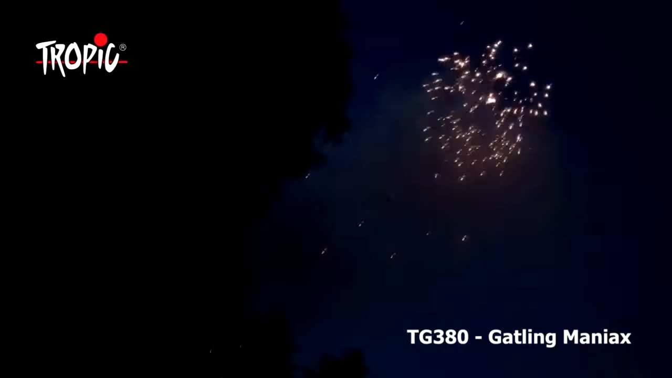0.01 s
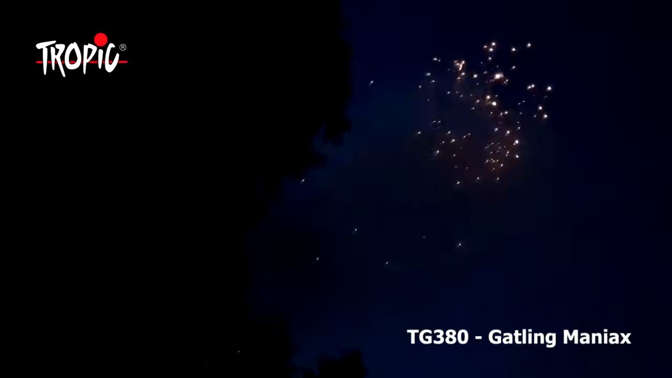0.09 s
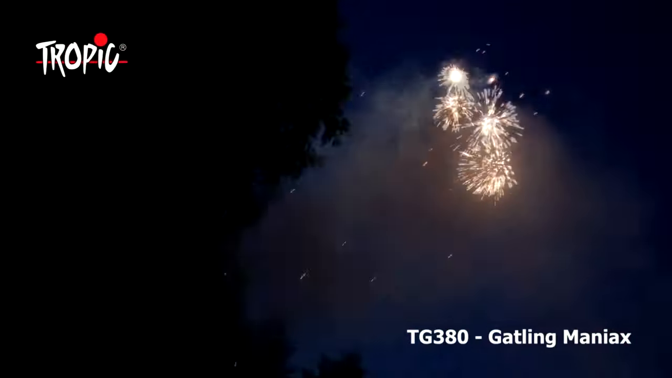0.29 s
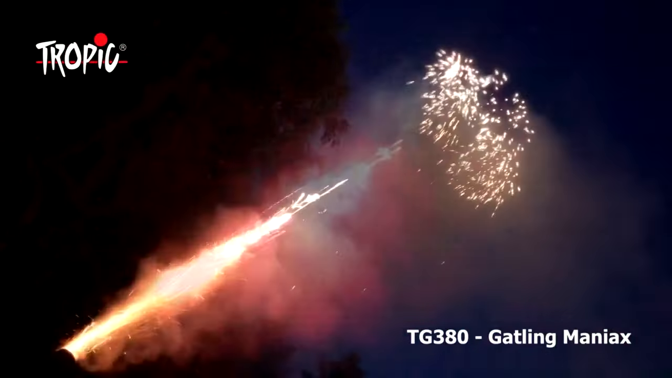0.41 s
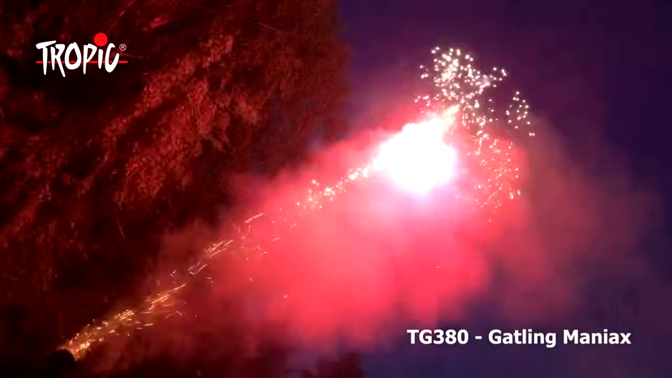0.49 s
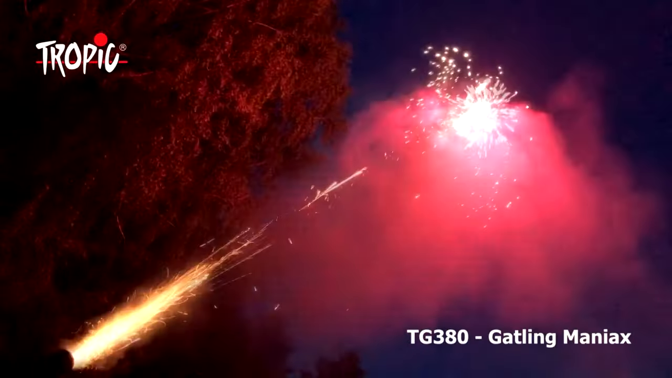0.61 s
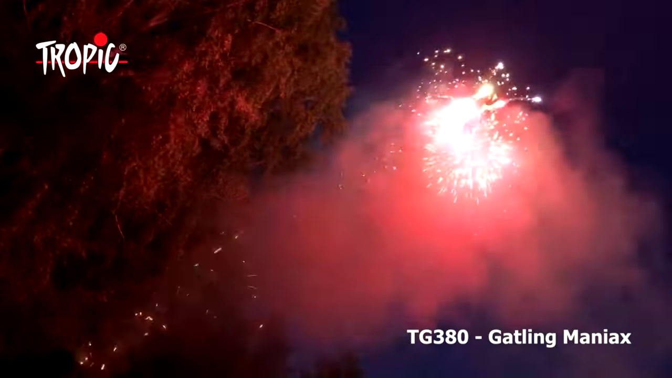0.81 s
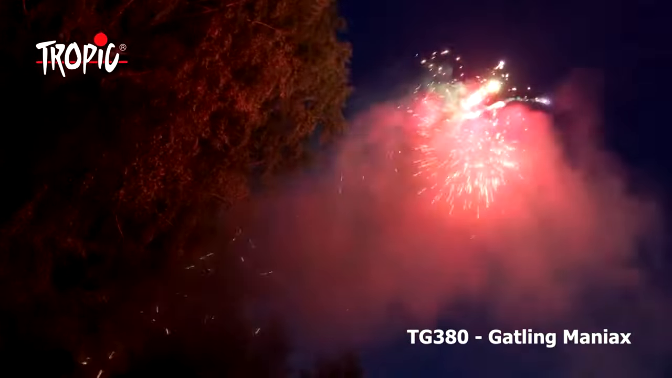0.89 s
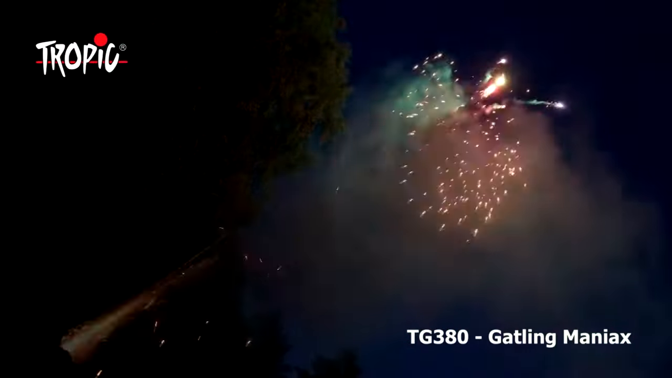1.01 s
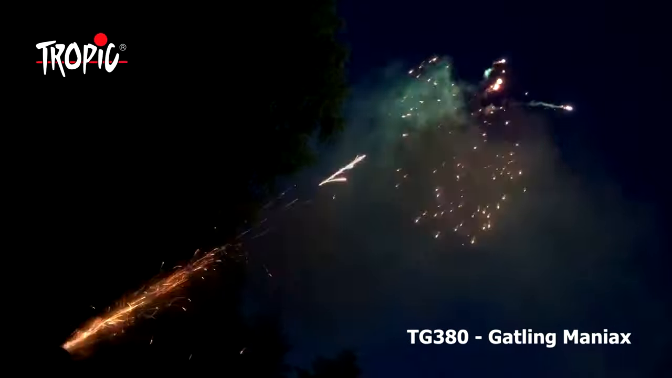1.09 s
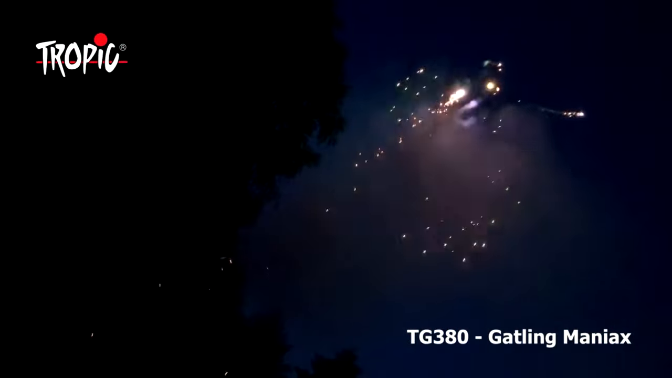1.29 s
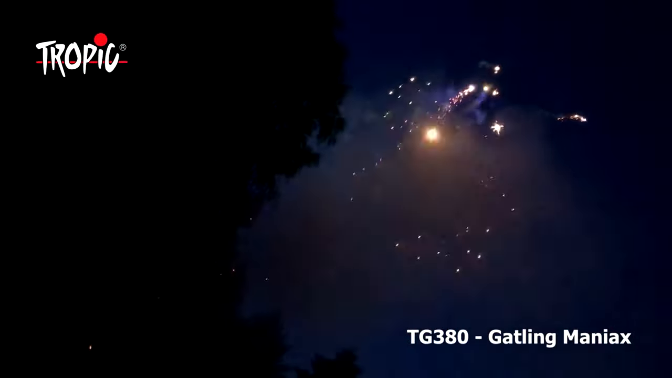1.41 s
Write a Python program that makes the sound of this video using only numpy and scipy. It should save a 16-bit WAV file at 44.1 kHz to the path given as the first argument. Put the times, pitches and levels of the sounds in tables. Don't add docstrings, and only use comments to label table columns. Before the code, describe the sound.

Multi-shot firework: sharp cracks and hissing thumps in quick clusters, with echoes fading between them

```python
import sys
import numpy as np
from scipy import signal
from scipy.fft import rfft, irfft, next_fast_len
from scipy.io import wavfile
from scipy.ndimage import uniform_filter1d

SR = 44100
rng = np.random.default_rng(int(sys.argv[2]) if len(sys.argv) > 2 else 0)


def wrap_up_sound(samples):
    columns = np.atleast_2d(samples).T
    tamed = np.clip(columns, -1, 1)
    steps = np.round(tamed * 32767).astype(np.int16)
    wavfile.write(sys.argv[1], SR, steps)


def volts(x):
    e = np.asarray(x, float) / 20
    return 10 ** e


N = 63945

# t/s, peak/dB, push length/ms, scattered echo/dB, limiter dip/dB
BANGS = [(0.2074, 8.5, 0.056, -27, -6.5), (0.2154, 4, 0.17, -36, -4), (.2372, 8.5, .07, -33, -8.5),
         (0.2562, -6.5, 0.6, -45, 0), (.2624, -5, 0.86, -18.5, -6.5), (.2855, -4, 0.31, -22.5, -21.5),
         (0.499, -1.5, 0.47, -23, -15), (0.5374, -3.5, 0.68, -28.5, -3), (0.5918, 7, 0.086, -22, -14),
         (0.7064, -7, .1, -38, 0), (.72115, 7, 0.1, -21.5, -15), (.9460, -2.5, 0.67, -29.5, 4),
         (1.3874, -11.5, 0.18, -43, -13), (1.4279, 5.5, 0.067, -40.5, 2)]


def read(table, f_hz, column=1):
    rows = np.array(table, float)
    return np.interp(np.log(np.maximum(f_hz, 1)), np.log(rows[:, 0]), rows[:, column])


def shape(x, response):
    size = next_fast_len(2 * N)
    f_hz = np.arange(size // 2 + 1) * SR / size
    return irfft(rfft(x, size) * response(f_hz), size)[..., :N]


def band(x, centre_hz, width_hz):
    def resonance(f):
        damping = 1j * f * width_hz
        return damping / (centre_hz ** 2 - f ** 2 + damping)
    return shape(x, resonance)


def unit(x):
    return x / np.sqrt(np.mean(x ** 2))


def blasts():
    # t/s, peak/dB
    crackles = [(.0685, -37), (.0750, -24), (.1160, -40), (.1277, -45), (.1420, -21), (.1925, -46),
                (0.254, 4), (0.2626, 1), (.2801, -24), (0.2835, -22), (0.4963, -19), (0.5293, 8),
                (0.5387, 7), (.9462, -4), (.7373, -22), (1.1100, -25), (1.1315, -22), (1.1733, -15.5),
                (1.392, -21), (1.3921, -21), (1.3944, -8), (1.398, -4.5), (1.4005, -21)]
    crackle_push_ms = 0.05
    rows = [b[:3] for b in BANGS] + [(s, db, crackle_push_ms) for s, db in crackles]

    def spectrum(f):
        total = 0
        for start_s, peak_db, push_ms in rows:
            push_s = push_ms / 1000
            jw = 2j * np.pi * f * push_s
            wave = SR * push_s * jw / (1 + jw) ** 2
            total = total + volts(peak_db) * wave * np.exp(-2j * np.pi * f * start_s)
        return total

    return shape(np.eye(1, N)[0], spectrum)


def through_air(x, t):
    last_stars_s, close_hz, far_hz = 1.3, 13500, 9400
    close = shape(x, lambda f: 1 / (1 + (f / close_hz) ** 4))
    far = shape(x, lambda f: 1 / (1 + (f / far_hz) ** 4))
    return np.where(t < last_stars_s, close, far)


def near_echoes(x):
    # delay/ms, level/dB, low-pass f/Hz
    reflections = [(.27, -8, 5000), (1.22, -6, 1400)]

    def paths(f):
        total = 1
        for delay_ms, db, dull_hz in reflections:
            total = total + volts(db) * np.exp(-2j * np.pi * f * delay_ms / 1000) / (1 + 1j * f / dull_hz)
        return total

    return shape(x, paths)


def jets(t):
    # start/s, end/s, rise/s, hiss/dB, rumble/dB
    spits = [
        (0.2438, 0.2607, 0.009, -10.5, -21),
        (0.2727, 0.2885, 0.0033, -10.5, -19),
        (0.4838, 0.4926, 0.0016, -35, -26.5),
        (.4900, 0.498, 0.0019, -9, -20.5),
        (0.5263, 0.5357, 0.00063, -8, -25.5),
        (0.927, 0.934, 0.0038, -33, -35),
        (0.935, 0.9483, 0.002, -10.5, -20),
        (1.3928, 1.398, 0.00072, -31.5, -50),
    ]
    grain_db, ring_db, sag_db, cutoff_s = 5.5, 3, -5, 0.00035
    grain_levels = np.repeat(rng.standard_normal(N // 16 + 1), 16)[:N]
    grains = rng.standard_normal(N) * volts(grain_db * grain_levels)
    broad = unit(band(grains, 7500, 17700))
    ring = unit(band(grains, 1950, 1420))
    hiss = unit(broad + volts(ring_db) * ring)
    rumble = unit(band(rng.standard_normal(N), 173, 210))
    out = 0
    for start_s, end_s, rise_s, hiss_db, rumble_db in spits:
        rise = np.clip((t - start_s) / rise_s, 0, 1) ** 2
        cut = np.clip((end_s - t) / cutoff_s, 0, 1)
        sag = volts(sag_db * np.clip((t - start_s) / (end_s - start_s), 0, 1))
        out = out + rise * cut * sag * (volts(hiss_db) * hiss + volts(rumble_db) * rumble)
    return out


def thuds(t):
    # t/s, peak/dB, f/Hz, t60/s
    rings = [(0.26, -21, 147.6, 0.091), (.2920, -9, 70, 0.065), (0.503, -13.5, 60, 0.059),
             (.5400, -21, 77.6, 0.074), (0.727, -30, 72, 0.057), (0.939, -27, 140, 0.031),
             (0.956, -22, 55, 0.069), (.4000, -36.5, 80, 0.14), (1.006, -37.5, 231.4, 0.11),
             (1.034, -38.5, 119.5, 0.069), (1.0850, -40, 129.5, 0.13)]
    out = 0
    for start_s, peak_db, f_hz, t60_s in rings:
        age_s = np.maximum(t - start_s, 0)
        swell = 1 - np.exp(-age_s * f_hz * 4)
        out = out - volts(peak_db - 60 * age_s / t60_s) * swell * np.sin(2 * np.pi * f_hz * age_s)
    return out


def scatter(t):
    # f/Hz, width/Hz, level/dB
    hollows = [(140, 38, -6), (238.6, 36, -1.5)]
    # f/Hz, density/(dB per Hz)
    colour = [(24, -27), (40, -13), (180, -17), (663, -10), (896, -7.5), (1550, -9), (2840, -7),
              (7170, -12), (16000, -11)]
    # f/Hz, quick t60/s, slow t60/s, slow share/dB
    fades = [(60, 0.11, 1.95, -13), (200, 0.2, 2.23, -8.5), (557, 0.14, 0.85, -6),
             (2160, 0.25, 1.052, -2.5), (5970, 0.36, 0.99, -9.5), (15000, 0.26, 1, -19)]
    rise_s, flutter_db, star_push_max_ms = 0.001, 2, 0.2
    lift_treble_db, lift_bass_db, star_treble_db = 2.5, 5, -5
    lift_slow_db = -7

    step = 32
    coarse = t[::step]
    earlier_bang = (-0.23, -26.5, 0)
    rows = np.array([earlier_bang] + [(b[0], b[3], b[2] > star_push_max_ms) for b in BANGS])
    age_s = np.maximum(coarse - rows[:, :1], 0)
    lift = rows[:, 2:]
    start = volts(2 * rows[:, 1:2]) * (1 - np.exp(-age_s / rise_s)) ** 2

    centres_hz = 40 * 2 ** np.arange(0, 8.8, 0.5)
    total = np.sum(volts(2 * read(colour, centres_hz)) * centres_hz)
    bands = [(hz, hz * 0.5, 0) for hz in centres_hz] + list(hollows)
    out = 0
    for hz, width_hz, db in bands:
        quick_s, slow_s, share_db = (read(fades, hz, k) for k in (1, 2, 3))
        lift_db = lift_treble_db * max(np.log2(hz / 2500), 0) + lift_bass_db * max(np.log2(500 / hz), 0)
        star_db = star_treble_db * max(np.log2(hz / 5000), 0)
        tilt = volts(2 * lift * lift_db + 2 * (1 - lift) * star_db)
        quick = volts(-120 * age_s / quick_s)
        slow = volts(2 * (share_db + lift * lift_slow_db) - 120 * age_s / slow_s)
        power = np.sum(start * tilt * (quick + slow), axis=0)
        flutter = uniform_filter1d(rng.standard_normal(len(coarse)), size=16) * 4 * flutter_db
        noise = band(rng.standard_normal(N), hz, width_hz)
        noise = unit(band(noise, hz, width_hz))
        gain = np.sqrt(power * hz / total) * volts(read(colour, hz) + db + flutter)
        out = out + np.interp(t, coarse, gain) * noise
    return out


def night():
    # f/Hz, density/(dB per Hz)
    hum = [(18, -42), (30, -6), (138, -15), (266, -5.5), (426, -19), (1590, -15.5), (1720, -16),
           (16000, -34)]
    noise = shape(rng.standard_normal(N), lambda f: volts(read(hum, f)))
    return volts(-58) * unit(noise)


def dips(t):
    hold_s, release_s = 0.0098, 0.00071
    curves_db = []
    for start_s, _, _, _, dip_db in BANGS:
        release = np.exp(-np.maximum(t - start_s - hold_s, 0) / release_s)
        curves_db.append(dip_db * (t > start_s) * release)
    return volts(uniform_filter1d(np.min(curves_db, axis=0), size=12))


def scene():
    t = np.arange(N) / SR
    heard = near_echoes(through_air(blasts(), t))
    background = dips(t) * (scatter(t) + night())
    return (heard + jets(t) + thuds(t) + background)[None]


def top_cut(x):
    return signal.sosfilt(signal.butter(12, 16990, fs=SR, output="sos"), x)


def record(dry):
    # f/Hz, gain/dB
    mic = [(40, -4.5), (150, 6), (1000, 0), (1900, 2.5), (2900, -3.5), (4300, 2.5), (8000, 0.5),
           (16000, -6.5)]
    ceiling, top_hz = 0.95, 16200

    def all_pass(f, turn_hz):
        return (1 - 1j * f / turn_hz) / (1 + 1j * f / turn_hz)

    def response(f):
        return volts(read(mic, f)) * all_pass(f, 430) ** 7 * all_pass(f, 6000)

    x = ceiling * np.tanh(shape(dry, response) / ceiling)
    x = signal.sosfilt(signal.ellip(8, 0.2, 22, top_hz, fs=SR, output="sos"), x)
    return top_cut(x)


dry = scene()
out = record(dry)
wrap_up_sound(out)
```